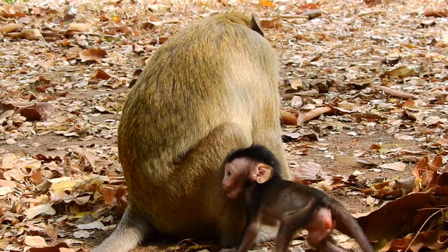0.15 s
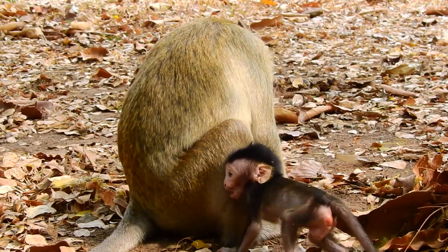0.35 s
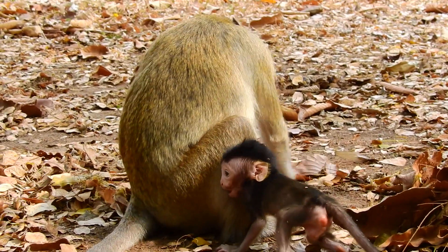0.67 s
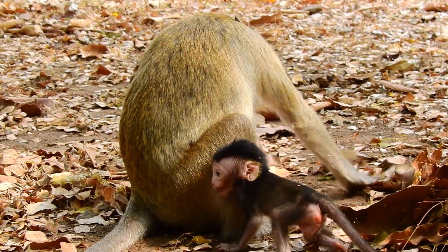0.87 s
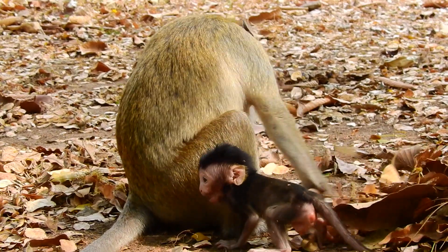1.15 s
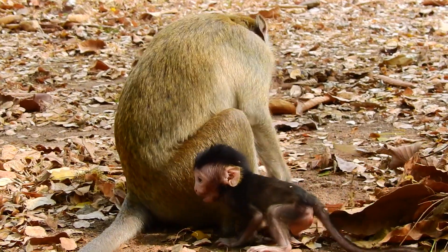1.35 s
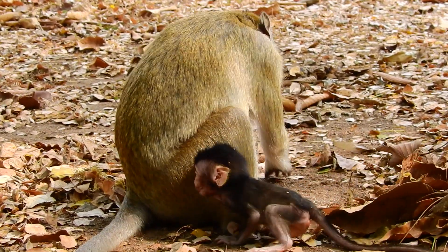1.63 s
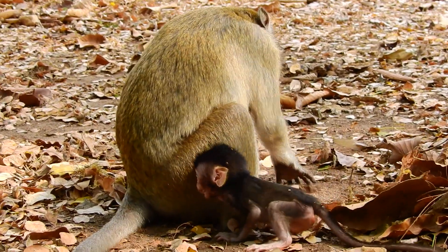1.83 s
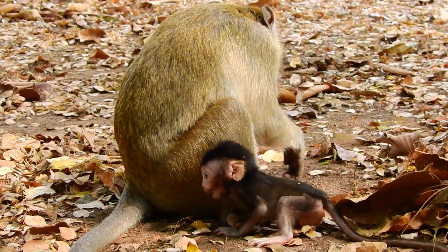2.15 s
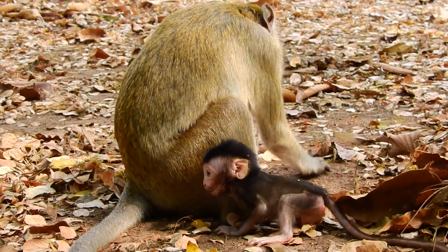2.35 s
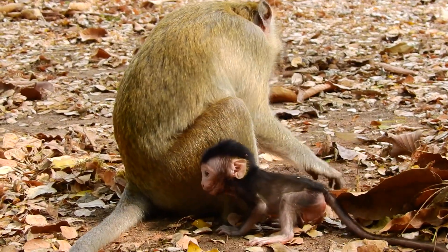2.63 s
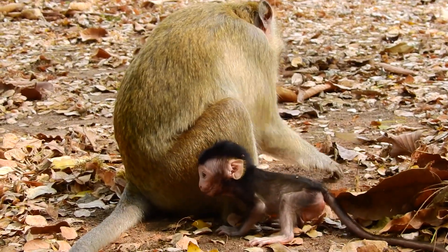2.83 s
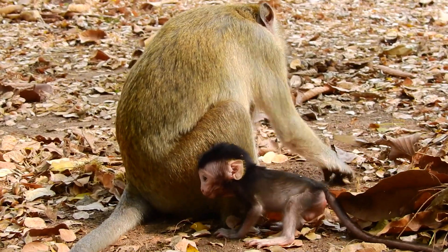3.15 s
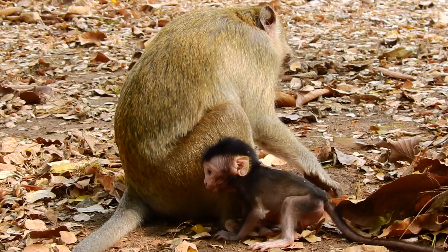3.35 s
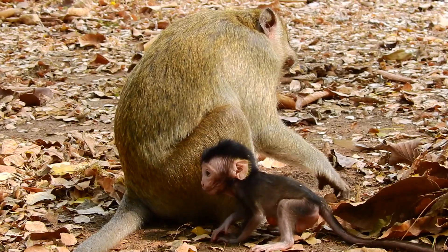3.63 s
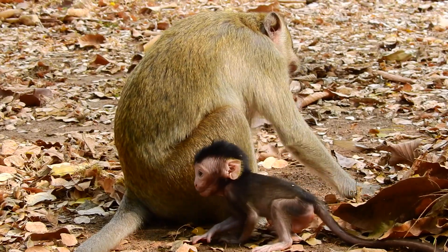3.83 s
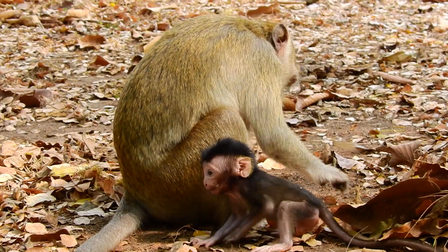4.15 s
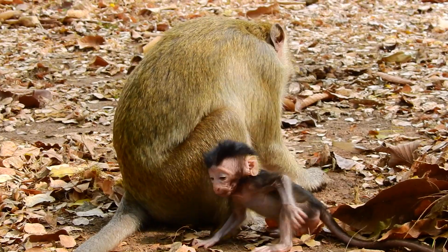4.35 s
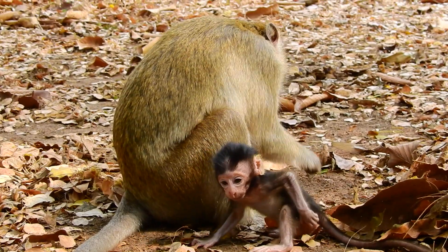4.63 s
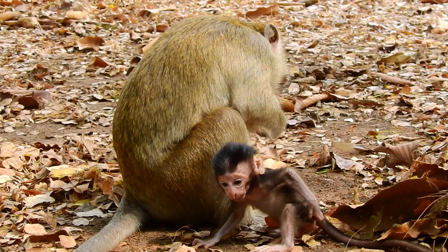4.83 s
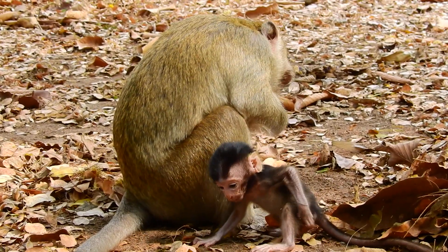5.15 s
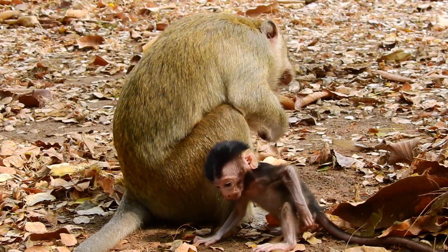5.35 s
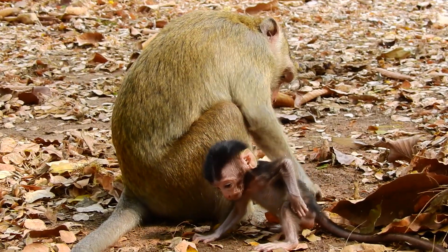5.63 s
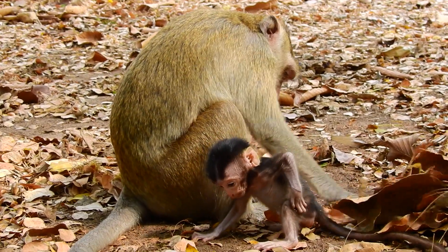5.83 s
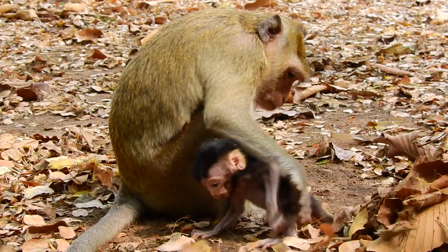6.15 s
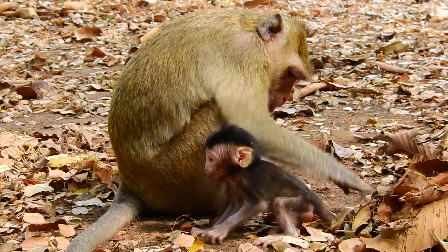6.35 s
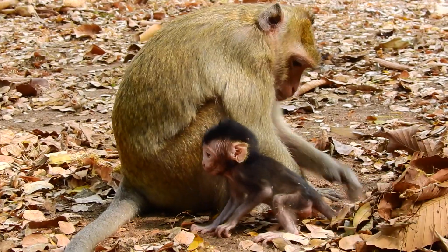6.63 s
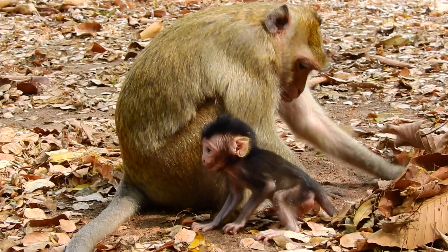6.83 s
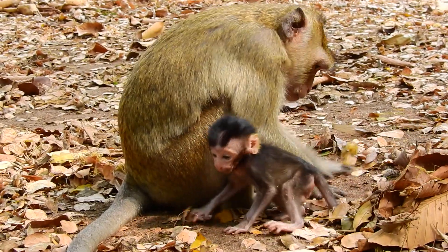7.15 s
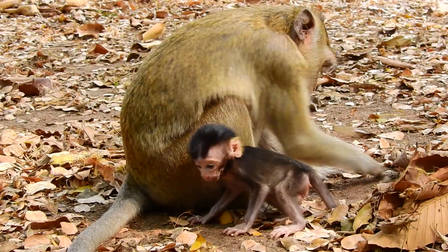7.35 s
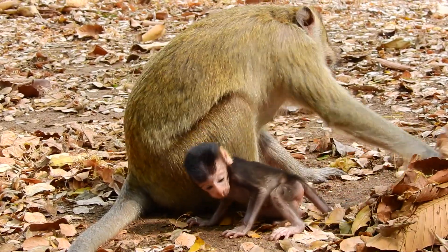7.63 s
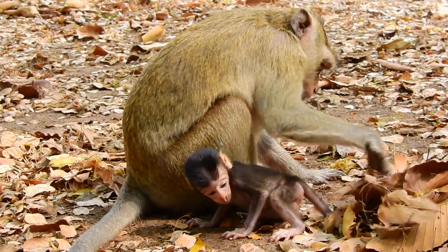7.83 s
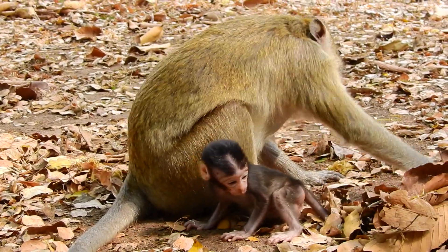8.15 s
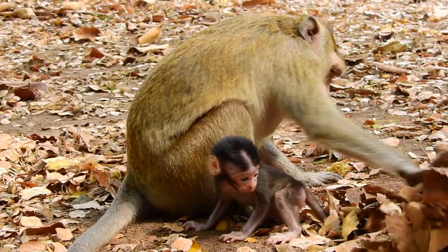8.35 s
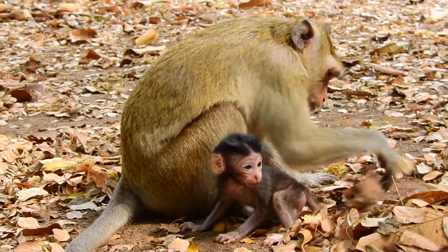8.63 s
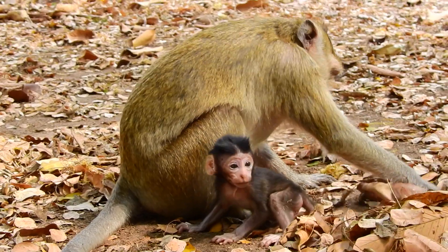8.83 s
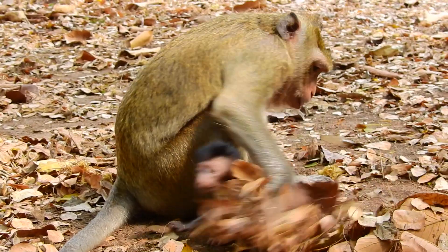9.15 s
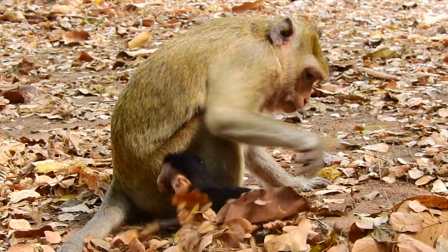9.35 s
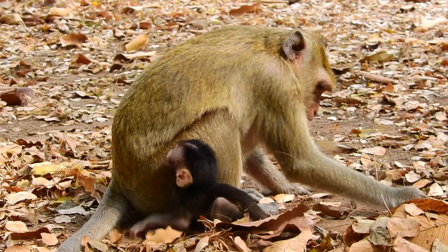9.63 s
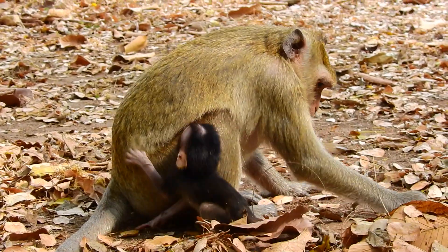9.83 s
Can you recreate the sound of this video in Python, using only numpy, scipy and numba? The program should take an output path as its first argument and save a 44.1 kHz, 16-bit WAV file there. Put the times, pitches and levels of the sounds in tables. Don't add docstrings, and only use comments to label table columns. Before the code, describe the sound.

Outdoors, a dense, wide cicada chorus rings throughout, its pitch sagging briefly around the middle. A slow engine throbs some distance away over soft traffic hum, with faint bird whistles early on. A monkey brushes dry leaves near the start, then rakes them in brisk crackling strokes during the second half. Stereo microphone close to the litter.

```python
import sys
import numpy as np
from scipy import signal
from scipy.fft import rfft, irfft, next_fast_len
from scipy.io import wavfile
from scipy.ndimage import uniform_filter1d
from numba import njit

SR = 44100
rng = np.random.default_rng(int(sys.argv[2]) if len(sys.argv) > 2 else 0)


def invert_db(x):
    u = np.asarray(x, float) / 20
    return 10 ** u


def put_to_file(sound):
    columns = np.atleast_2d(sound).T
    safe = np.clip(columns, -1, 1)
    whole_steps = np.round(safe * 32767)
    wavfile.write(sys.argv[1], SR, whole_steps.astype(np.int16))


N = 440118
T = np.arange(N) / SR


def unit(x):
    return x / np.sqrt(np.mean(x ** 2))


def curves(table):
    s, *columns = np.transpose(table)
    return [np.interp(T, s, c) for c in columns]


@njit
def svf(x, hz, width, count):
    y, ring, low = np.empty(len(x)), np.zeros(count), np.zeros(count)
    for i in range(len(x)):
        g = np.tan(np.pi * hz[i] / SR)
        damping = width / hz[i]
        s = x[i]
        for n in range(count):
            v = (ring[n] + g * (s - low[n])) / (1 + g * (g + damping))
            ring[n] = 2 * v - ring[n]
            low[n] += 2 * g * v
            s = damping * v
        y[i] = s
    return y


def band(x, hz, width, count=2):
    return svf(x, hz + np.zeros(N), 1. * width, count)


def colour(x, points, lag=0.):
    size = next_fast_len(N, True)
    f = np.fft.rfftfreq(size, 1 / SR) + 1
    hz, db = np.transpose(points)
    gain = invert_db(np.interp(np.log(f), np.log(hz), db))
    delay = np.exp(-2j * np.pi * f * lag / SR)
    return irfft(rfft(x, size) * gain * delay, size)[:N]


def spread(shared, side_db, points):
    side = invert_db(side_db) * colour(rng.standard_normal(N), points)
    return shared + side * np.array([[1], [-1]])


def walk(rate):
    hold = int(SR / rate / 32)
    coarse = np.repeat(rng.standard_normal(N // 32 // hold + 2), hold)
    coarse = uniform_filter1d(uniform_filter1d(coarse, hold), hold)
    return np.interp(np.arange(N) / 32, np.arange(len(coarse)), coarse)


def swell(s, length, attack):
    side_s = length * np.where(T < s, attack, 1 - attack)
    return np.exp(-((T - s) / side_s) ** 2)


def road():
    # f/Hz, level/dB per Hz
    air_tone = [(25, -8), (60, 11.5), (120, 21.5), (250, 10), (400, 0.5), (900, -4), (1300, -2), (2500, -5),
                (4000, -2), (8500, 5.5), (10500, -27.5), (12500, -31), (14300, -26.5), (15700, -35)]
    # t/s, level/dB
    air_level = [(0.0, -51), (0.33, -55.5), (2.67, -54), (5.3, -53.5), (7.0, -52.5), (9.98, -50)]
    # loudest t/s, length/s, tyre hum/dB, growl/dB
    vehicles = [(1.098, 0.35, -60, -71), (1.503, 1.26, -65, -48.5), (3.744, 1.1, -55, -46.5),
                (5.28, 1.5, -46.5, -67), (5.999, 0.85, -53, -49.5), (6.947, 0.67, -54.5, -66),
                (7.7, 0.57, -53, -65), (7.898, 0.33, -73, -48), (8.551, 1.2, -53, -57),
                (9.2, 0.47, -48.5, -44.5), (9.602, .8, -56, -46.5)]
    # t/s, f/Hz, level/dB
    revving = [
        (3.55, 338, -73),
        (3.65, 381.6, -48),
        (3.75, 478, -50),
        (3.85, 594, -60),
        (4.0, 623, -71),
    ]

    air_db, = curves(air_level)
    side_tone = [(25, -14), (150, 10), (300, 5)] + air_tone[4:]
    air = spread(colour(rng.standard_normal(N), air_tone), -8.5, side_tone)
    air /= np.std(band(air[0], 1500, 1510, count=1))
    air_gain = invert_db(air_db + 2.5 + 0.51 * walk(8.6))

    passes = np.array([swell(s, length, 0.35) for s, length, *_ in vehicles])
    between_db = np.array([[-61.5], [-62.5]])
    hum_gain, growl_gain = invert_db(np.array(vehicles)[:, 2:].T) @ passes + invert_db(between_db)
    hum = band(rng.standard_normal(N), 612 * (1 + 0.022 * walk(1.89)), 73)
    growl = band(rng.standard_normal(N), 440 * (1 + 0.085 * walk(2.14)), 220)

    rev_hz, rev_db = curves(revving)
    rev = band(rng.standard_normal(N), rev_hz, 80)
    traffic = invert_db(-3.5) * hum_gain * unit(hum) + invert_db(-5.5) * growl_gain * unit(growl)
    return air_gain * air + traffic + invert_db(rev_db) * unit(rev)


def bird():
    # t/s, length/s, start f/Hz, end f/Hz, level/dB
    whistles = [
        (0.743, 0.26, 3150, 3340, -52),
        (.93, .24, 3340, 3460, -50),
        (.76, 0.055, 2300, 2320, -56),
        (1.429, .06, 2600, 2620, -54),
        (1.973, .1, 2680, 2800, -55),
        (2.048, 0.13, 2840, 3020, -52),
        (2.458, 0.083, 3530, 3560, -52),
        (2.49, 0.17, 2540, 3050, -52),
        (6.315, 0.07, 4064, 4030, -47),
    ]
    out = np.zeros(N)
    blur = 0.75 + 1.46 * walk(300)
    for s, length, start_hz, end_hz, db in whistles:
        at = slice(int(s * SR), int((s + length) * SR))
        u = (T[at] - s) / length
        hz = start_hz + (end_hz - start_hz) * u
        tone = np.sin(2 * np.pi * np.cumsum(hz) / SR)
        out[at] += invert_db(db) * np.sin(np.pi * u) * blur[at] * tone
    return out


def engine():
    # t/s, firing rate f/Hz, level/dB
    speed = [(0.0, 33.74, -39), (0.94, 31.7, -34), (1.6, 34.68, -34.5), (1.95, 33.22, -33.5),
             (2.65, 33.2, -35.5), (3.05, 29.2, -33), (3.53, 27.53, -32), (3.8, 32.8, -32.5),
             (4.03, 33.17, -32.5), (4.78, 26.04, -34), (5.15, 31.27, -31), (5.75, 33.93, -32.5),
             (6.4, 31.78, -32), (6.97, 26.54, -30.5), (8.97, 22.42, -32), (9.3, 28.2, -25),
             (9.62, 31.22, -28), (9.98, 32.3, -25.5)]
    # multiple of the firing rate, level/dB
    overtones = [(2, -13), (3, 0), (4, 1), (5, -0.5), (6, -3.5), (7, -12), (8, -6.5), (9, -6), (10, -7),
                 (11, -4.5), (12, -5.5), (13, -7.5), (14, -17)]
    # start t/s, end t/s, low boom/dB, upper bark/dB
    labour = [(0.115, .95, 14, 2), (1.2, 1.7, -17, 1), (1.75, 2.7, 10.5, 3.5), (2.77, 3.535, 12.5, 10.5),
              (4.1, 4.84, 14.5, 5.5), (5.5, 6.101, -6, 4), (6.3, 7.11, 13, 5), (7.094, 8.095, 14, 9.5),
              (8.098, 8.701, 14.5, 9.5), (8.698, 9.0, 14.5, 3), (9.449, 9.981, -9, 7)]
    # t/s, length/s, level/dB
    surges = [(1.05, .3, 2.5), (1.495, 0.23, 3.8), (2.872, 0.14, 4.5), (3.302, .25, 2), (4.39, .4, 4),
              (4.749, .2, -2), (5.304, 0.21, 1.5), (6.0, 0.3, -1), (6.701, 0.5, 4), (7.199, 0.37, 0.5),
              (9.2, 0.26, 2.5), (7.8, .5, 0), (8.397, 0.5, -2), (8.96, 0.15, 4), (9.5, .2, 0),
              (9.757, 0.18, 3)]
    take_up_s = 0.072
    pipe_hz, pipe_width_hz = 272, 36.4
    silencer_hz, low_hz = 221, 156.3

    hz, level_db = uniform_filter1d(curves(speed), SR // 10)
    spells = np.array([(T > start) & (T < end) for start, end, *_ in labour])
    load_db = np.array(labour)[:, 2:].T @ spells
    boom_db, bark_db = uniform_filter1d(load_db, max(int(take_up_s * SR), 1))
    low_db, upper_db = -18 + boom_db, -16 + bark_db
    level_db = level_db + sum(db * swell(s, length, 0.45) for s, length, db in surges)

    phase = 2 * np.pi * np.cumsum(hz * (1 + 0.00086 * walk(5.8))) / SR
    tones = 0
    for k, db in overtones:
        pipe_db = upper_db - 4.1 * ((k * hz - pipe_hz) / pipe_width_hz) ** 2
        above = np.clip((k * hz - silencer_hz) / 25 + .5, 0, 1)
        below = np.clip((low_hz - k * hz) / 60, 0, 1.2)
        gain = invert_db(db + above * pipe_db + below * low_db + 2.1 * walk(2.42))
        tones = tones + gain * np.sin(k * phase + 0.52 * walk(2.183))

    rumble = band(rng.standard_normal(N), 104.5, 118)
    rumble = spread(unit(rumble), 2.7, [(20, -1.0), (300, -10.0), (400, -33)])
    rumble_gain = invert_db(-38.5 + 0.11 * (level_db + 14.0))
    sound = invert_db(level_db - 0.5) * tones + rumble_gain * rumble
    return sound * invert_db(np.array([[.2], [-.2]]))


def knocks():
    # t/s, f/Hz, width/Hz, ring/s, level/dB
    hits = [
        (3.457, 1794, 4000, 0.0085, -38),
        (9.049, 600, 150, 0.0083, -27),
        (9.237, 4400, 900, 0.089, -27),
    ]
    out = np.zeros(N)
    noise = rng.standard_normal(N)
    for s, hz, width, ring, db in hits:
        burst = (T > s) * np.exp(-np.abs(T - s) / ring) * noise
        even_out = np.sqrt(SR / width / 3)
        out += invert_db(db) * even_out * band(burst + 1e-18, hz, width)
    return out


def leaves():
    # loudest t/s, length/s, level/dB
    strokes = [(1.02, 0.13, -43.5), (1.17, 0.16, -45), (1.305, 0.2, -49), (5.55, 0.54, -52.5),
               (5.867, .07, -44.5), (5.938, 0.11, -44), (6.017, 0.09, -39), (6.092, .05, -46),
               (6.2, 0.19, -47.5), (6.49, 0.44, -49.5), (6.96, 0.6, -47), (7.658, 0.17, -43),
               (7.79, .14, -40.5), (7.884, 0.12, -49), (8.187, 0.2, -42), (8.3, .12, -45.5),
               (8.444, .2, -40.5), (8.556, .06, -40.5), (8.697, 0.18, -43.5), (9.023, 0.28, -44.5),
               (9.136, .08, -40.5), (9.22, 0.12, -37), (9.343, .15, -45.5)]
    # f/Hz, level/dB per Hz
    leaf_tone = [(150, -37), (400, -7), (700, -6), (1500, 0.5), (3000, -3), (5000, -5.5), (9000, -12),
                 (13000, -28.5), (15500, -39)]
    gain, bright = np.zeros((2, N))
    for s, length, db in strokes:
        stroke = invert_db(db) * swell(s, length, 0.46)
        gain = gain + stroke
        bright = bright + stroke * invert_db(0.63 * (db + 43.5))

    chance = rng.random((3, N))
    grains = (chance[0] < .04) * invert_db(2.0 * -np.log(chance[1])) * np.sign(chance[2] - .5)
    rustle = unit(grains) + 0.71 * rng.standard_normal(N)
    crackle = unit(spread(colour(rustle, leaf_tone), -10.5, leaf_tone))
    body = signal.sosfilt(signal.butter(2, 3500, fs=SR, output="sos"), crackle)
    snap = crackle - body
    return invert_db(1.03 + 1.66 * walk(60)) * (gain * body + bright * snap)


def clicks(rate, jitter, count):
    chance = rng.standard_normal((count, 7000, 2))
    own_rate = 1 + .15 * chance[:, :1, 1]
    period = SR / rate * own_rate * (1 + jitter * chance[..., 0])
    at = np.cumsum(period, axis=1).astype(int)
    return unit(np.bincount(at[at < N], chance[..., 1][at < N], N))


def trunk_echoes(song):
    trunks = rng.standard_normal(2048) * np.exp(-T[:2048] / 0.039)
    trunks *= .24 / np.linalg.norm(trunks)
    trunks[0] = 1
    return signal.oaconvolve(song, trunks[None] / np.linalg.norm(trunks))[:, :N]


def cicadas():
    # t/s, song level/dB, sag of the high singers/dB, sag of the deep singers/dB
    chorus = [(0.0, -25, .5, 0.4), (0.5, -25, 0.1, 1), (1.0, -25.5, .3, 0.7), (1.5, -25, -0.5, 0.5),
              (2.0, -25.5, -0.6, -0.4), (2.6, -26, -0.6, -1), (3.0, -25.5, -2.5, -2), (3.5, -26, -3, -3.5),
              (4.0, -25, -2.5, -3), (4.5, -24, -1.5, -1.3), (5.0, -23.5, -.7, 1), (5.5, -24.5, -0.2, -0.1),
              (6.5, -25, 0.24, 0.4), (7.5, -24.5, 0.05, 0.9), (8.5, -25, 0.26, 0.4), (9.2, -25, .3, 1),
              (9.6, -24.5, -0.5, 1), (9.98, -26, -1.5, -2.5)]
    # f/Hz, width/Hz, level/dB, lag of the left ear/samples, likeness of the ears/0-1
    tymbals = [
        (6216, 1550, 4.5, 1.85, 0.54),
        (5210, 1240, 2.5, 0.76, 0.31),
        (6990, 1380, 4, 1.79, 0.36),
        (7536, 1630, 7, 1.75, 0.6),
        (4400, 1000, -25.5, 0.72, 0.98),
    ]
    # resting level/dB, gain per dB of sag/dB
    sag_gain = [
        (0.0, 0.02),
        (-4.5, -0.3),
        (-1, 2),
        (-8.5, 1.45),
        (-2.5, -3),
    ]
    level_db, high_db, deep_db = curves(chorus)
    out = np.zeros((2, N))
    for (hz, width, db, lag, like), (rest_db, slope) in zip(tymbals, sag_gain):
        songs = [clicks(rate=450, jitter=.1, count=6) for _ in range(3)]
        fade_db = deep_db if hz < 5700 else high_db
        centre = hz * (1 + 0.013 * fade_db) * (1 + .006 * walk(3))
        shared, left, right = (unit(band(s, centre, width, count=3)) * invert_db(0.31 * walk(9.1)) for s in songs)
        both = np.array([colour(shared, [(1, 0.00043), (2, 0.0079)], lag), shared])
        apart = np.array([left, right])
        gain = invert_db(level_db + rest_db + slope * fade_db + db)
        out += gain * (np.sqrt(like) * both + np.sqrt(1 - like) * apart)
    return trunk_echoes(out)


def scene():
    return road() + bird() + engine() + knocks() + leaves() + cicadas()


def ripple_near_4k(dry):
    late_band = np.array([band(c, 3870, 540) for c in dry])
    return dry + .7 * np.pad(late_band, ((0, 0), (455, 0)))[:, :N]


def drop_faint_top(x):
    top = signal.sosfiltfilt(signal.butter(8, 10600, "high", fs=SR, output="sos"), x)
    top_db = 10 * np.log10(uniform_filter1d(top[0] ** 2, 2048) + 1e-18)
    shut = top_db - np.median(top_db) + 7 * walk(45) < -1.5
    return x - top * uniform_filter1d(1. * shut, 512)


def low_pass(x):
    return signal.sosfilt(signal.butter(12, 15720, fs=SR, output="sos"), x)


def record(dry):
    mix = drop_faint_top(ripple_near_4k(dry))
    return low_pass(mix)


dry = scene()
out = record(dry)
put_to_file(out)
```